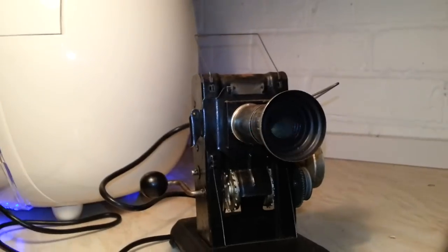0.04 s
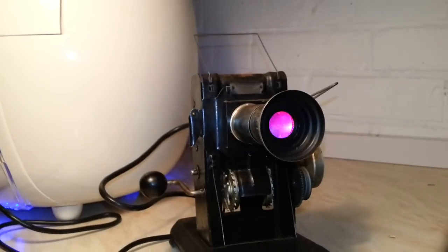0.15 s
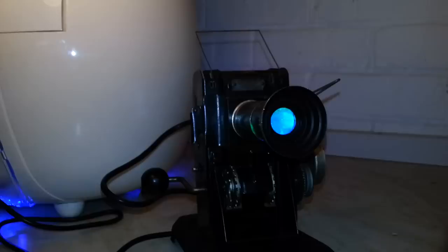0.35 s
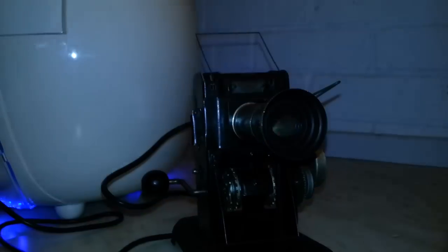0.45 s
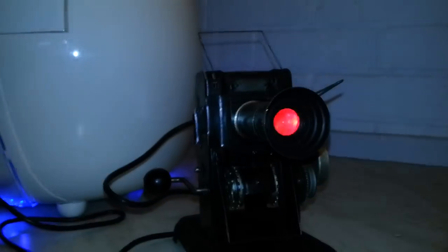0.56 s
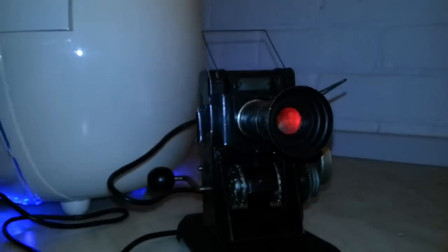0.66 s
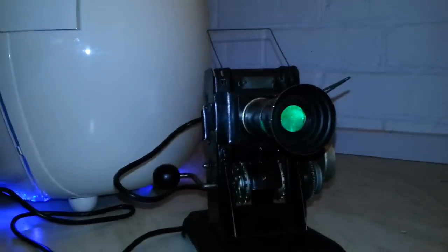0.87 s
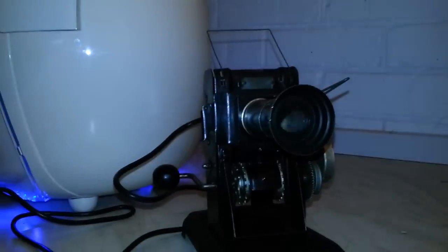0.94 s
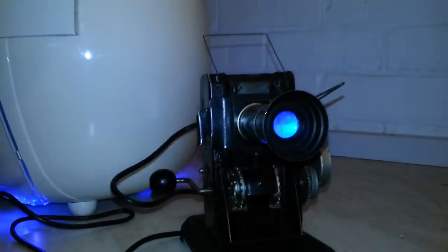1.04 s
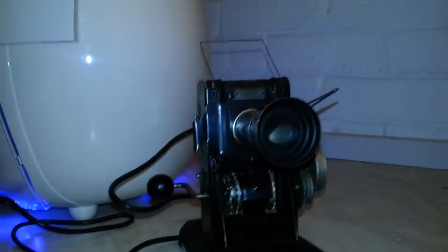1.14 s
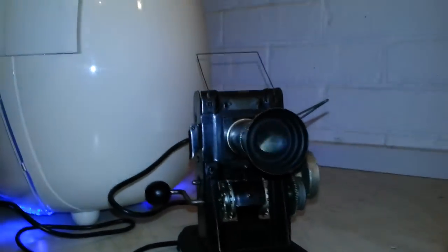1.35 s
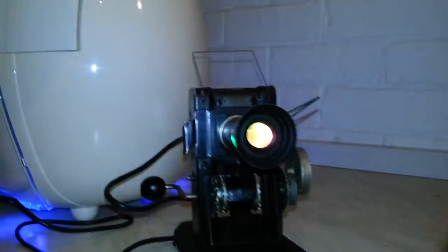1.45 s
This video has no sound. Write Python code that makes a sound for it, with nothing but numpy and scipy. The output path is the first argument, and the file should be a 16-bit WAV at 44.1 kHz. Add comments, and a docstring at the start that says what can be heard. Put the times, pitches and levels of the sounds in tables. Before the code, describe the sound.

A plastic light switch snaps down and straight back up, two sharp clicks close to the microphone and slightly right. Soft knocks and faint handling ticks surround them, over the low hiss and rumble of a small quiet room.

```python
"""A plastic light switch snaps down and back up, close by and a little to the right, in a small quiet room.
The button knocks softly as the finger loads it; then the spring snaps over and the contact lands and
rebounds. The housing and its mount ring, nearby surfaces and the room answer. Underneath are faint
plastic ticks, the hand rumbling on the housing, and low room rumble and hiss."""
import sys
import numpy as np
from scipy import signal
from scipy.fft import rfft, irfft
from scipy.io import wavfile
from scipy.ndimage import uniform_filter1d

SR = 44100
rng = np.random.default_rng(int(sys.argv[2]) if len(sys.argv) > 2 else 0)


def digitize_waveform(pressure):
    """Quantize a signal to 16-bit integers and store it at the path in sys.argv[1].

    Rows of a 2-D input are taken as channels; values are limited to [-1, 1].
    """
    field = np.atleast_2d(pressure).T
    bounded = np.clip(field, -1, 1)
    quanta = np.round(bounded * 32767).astype(np.int16)
    wavfile.write(sys.argv[1], SR, quanta)


N = 66150
T, HZ = np.arange(N) / SR, np.fft.rfftfreq(N, 1 / SR)

# spring snaps, down then up: t/s, level/dB, housing ring/dB, spring ping/dB, rattle/dB, room send/dB
SNAPS = [(0.2230, 0, -2.5, -28, 3, 2), (0.4114, -2.5, -6.5, -6.5, -4, -0.5)]
# ringing modes of the plastic housing (the first row is the lowest): f/Hz, level/dB, t60/s
HOUSING_MODES = [(1200, 9, 0.15), (1340, -21, 0.14), (1363, -0.5, 0.27), (1710, -8, 0.096), (1970, -7, .12),
                 (2135, -9, 0.08), (2680, -18, 0.072), (2750, -13, .12), (3160, 4.5, 0.069),
                 (3130, -13, 0.19), (3670, -14, 0.027), (3777, 10, 0.052)]


def amp(db):
    """Decibels to gain."""
    return 10 ** (np.asarray(db) / 20)


def curve(points, hz):
    """Reads a breakpoint curve on a log-frequency axis."""
    f, value = np.transpose(points)
    return np.interp(np.log(hz + 1), np.log(f), value)


def unit(x):
    """Normalises to a mean energy of one per channel."""
    return x / np.sqrt((x ** 2).sum(-1).mean() + 1e-20)


def delayed(x, s):
    """The same sound, s seconds later."""
    silence = np.zeros(x.shape[:-1] + (round(s * SR),))
    return np.concatenate([silence, x], -1)[..., :N]


def through(x, response):
    """Convolution, channel by channel."""
    return signal.fftconvolve(np.atleast_2d(x), np.atleast_2d(response), axes=1)[:, :N]


def impact(colour, size=4096):
    """A minimum-phase click shaped by an EQ curve."""
    log_gain = np.log(amp(curve(colour, abs(np.fft.fftfreq(size, 1 / SR)))))
    click = np.fft.ifft(np.exp(np.conj(signal.hilbert(log_gain)))).real
    return unit(np.pad(click[:size // 2], (0, N - size // 2)))


def ring(hz, t60):
    """One dying mode: the slope of a damped sine, for a hard attack."""
    damped_sine = amp(-60 * T / t60) * np.sin(2 * np.pi * hz * T)
    return np.diff(damped_sine, prepend=0) * SR / (2 * np.pi * hz)


def struck(modes):
    """A struck object, each mode starting with random polarity."""
    return unit(sum(amp(db) * rng.choice([-1, 1]) * ring(hz, t60) for hz, db, t60 in modes))


def stereo_noise(correlation):
    """White noise with the given left-right correlation."""
    a, b = rfft(rng.standard_normal((2, N)))
    return irfft(np.array([a, correlation * a + np.sqrt(1 - correlation ** 2) * b]), N)


def noise_bed(colour):
    """Wide, steady coloured noise at an rms of one."""
    # left-right likeness of the bed: f/Hz, correlation/0-1
    correlation = [(50, 0.13), (250, 0.32), (1000, 0.17), (10000, 0)]
    white = stereo_noise(curve(correlation, HZ))
    return np.sqrt(N) * unit(irfft(rfft(white) * amp(curve(colour, HZ)), N))


def room_tone():
    """Steady room rumble and hiss."""
    # room tone EQ: f/Hz, level/dB
    colour = [(15, -40), (25, -22), (60, -9.5), (100, -4.5), (200, -5), (300, -8), (500, -11.5),
              (800, -13.5), (1200, -15.5), (2200, -19), (3200, -19.5), (4500, -20), (6200, -26),
              (9000, -23.5), (14500, -24)]
    return amp(-56.5) * noise_bed(colour)


def reverb(x, attack_s=0.005):
    """The small room's diffuse tail, each band dying at its own speed."""
    # room decay: f/Hz, t60/s
    decay = [(200, 0.54), (1000, 0.29), (2500, 0.26), (5000, 0.27), (9000, 0.29), (14000, 0.61)]
    # tail EQ: f/Hz, level/dB
    colour = [(200, 12), (1000, -1.5), (2500, 0), (3800, 3.5), (5500, -3), (9000, 4), (14000, 0.5)]
    hz, t, bands = signal.stft(stereo_noise(correlation=0.17), SR, nperseg=256)
    bands = bands * amp(curve(colour, hz)[:, None] - 60 * t / curve(decay, hz)[:, None])
    tail = signal.istft(bands, SR, nperseg=256)[1][:, :N] * np.minimum(T / attack_s, 1)
    return unit(through(x, tail))


def reflections(x):
    """Early echoes off the table and the wall."""
    # echo taps: left delay/s, right delay/s, level/dB
    taps = [(.0029, .0027, -10), (.0072, 0.011, -12)]
    return sum(amp(db) * np.array([delayed(x, left), delayed(x, right)]) for left, right, db in taps)


def from_right(x, lag_s=0.000227):
    """A sound on the right reaches the left channel a little later."""
    x = np.atleast_2d(x)
    return np.array([delayed(x[0], lag_s), x[-1]])


def hand(start_s=0.08, end_s=0.579, fade_s=0.15):
    """Dull rubbing on the housing while the switch is held; fades are centred on start and end."""
    # rubbing EQ: f/Hz, level/dB
    colour = [(40, -44), (140, -18.5), (220, -3.5), (320, -7.5), (430, -16.5), (560, -7), (800, -22.5),
              (1800, -13.5), (4000, -28), (14000, -31.5)]
    held = np.clip(np.minimum(T - start_s, end_s - T) / fade_s + 0.5, 0, 1)
    return amp(-52.5) * held * noise_bed(colour)


def rattle(click, t60=0.024, attack_s=0.00087):
    """A dense, quickly dying cluster of tiny contacts: a flattened noise burst coloured by the click."""
    envelope = (1 - np.exp(-T / attack_s)) * amp(-60 * T / t60)
    spectrum = rfft(stereo_noise(correlation=0.34) * envelope)
    contour = np.sqrt(uniform_filter1d(abs(spectrum) ** 2, 900, axis=1))
    burst = unit(irfft(spectrum / contour, N) * (T < 2 * t60))
    return unit(through(click, burst))


def plastic_ticks():
    """Tiny scrapes of handled plastic, each around its own pitch."""
    # tick cues: t/s, level/dB, f/Hz
    cues = [(0.0935, -33, 3440), (0.118, -35, 3150), (0.149, -36, 3140), (0.7577, -38, 3880),
            (0.989, -34, 3400), (1.052, -31.5, 2750)]
    # tick EQ: multiple of the pitch, level/dB
    colour = [(.06, -19), (.5, -20), (.82, -17), (1, -4.5), (1.22, -18.5), (4, -25.5)]
    out = np.zeros((2, N))
    for s, db, hz in cues:
        tick = impact([(hz * multiple, level) for multiple, level in colour])
        out += amp(db) * delayed(rattle(tick, t60=0.019) + amp(0.5) * reverb(tick), s)
    return out


def button_knocks():
    """The button knocks in its guide; such soft blows wake only the housing's lowest mode."""
    # knock cues: t/s, level/dB
    cues = [(0.1187, -21), (0.1472, -14.5), (0.1925, -14.5), (0.2190, -14.5), (0.3537, -10.5)]
    # knock EQ: f/Hz, level/dB
    colour = [(100, -47), (250, -21.5), (550, -20.5), (800, -16), (1020, -4), (1180, 1), (1450, -15),
              (1800, -10.5), (2500, -29), (3500, -23.5), (5000, -41), (14000, -37)]
    blow = impact(colour)
    housing = unit(through(blow, ring(HOUSING_MODES[0][0], t60=0.098)))
    knock = from_right(unit(blow + amp(-2) * housing))
    return sum(amp(db) * delayed(knock + amp(-8.5) * reverb(blow), s) for s, db in cues)


def mount_ring():
    """Each snap leaves a faint, hollow low ring in whatever holds the switch."""
    # modes of the mount: f/Hz, level/dB, t60/s
    modes = [(197.7, -3, .5), (242.3, 0, 0.62), (311.5, -3.5, 0.36)]
    return sum(amp(-21.5) * delayed(from_right(struck(modes)), s) for s, *_ in SNAPS)


def contact_landings():
    """The contact lands and rebounds, each hit a click with a short rattle."""
    # hits around the snaps: t/s, level/dB, rattle/dB
    cues = [(0.2237, -0.5, -2), (0.2259, -14, 2), (0.4105, -12.5, -1.5), (0.4392, -14.5, -0.5),
            (0.4510, -19.5, -2)]
    # contact EQ: f/Hz, level/dB
    colour = [(100, -34), (550, -16), (750, -6.5), (1000, -1.5), (1350, 1.5), (1900, 3.5), (2400, -0.5),
              (3400, 4), (4600, -8.5), (7000, -12.5), (14500, -26.5)]
    click = impact(colour)
    out = np.zeros((2, N))
    for s, db, rattle_db in cues:
        out += amp(db) * delayed(from_right(click + amp(rattle_db) * rattle(click)), s)
    return out


def spring_snaps():
    """The spring snaps over with a sharp click, pings and rattles, and sets the housing ringing."""
    # click EQs, one going down and one coming up: f/Hz, level/dB
    colours = [
        [(100, -49.5), (300, -27.5), (600, -20.5), (760, -11), (950, -6), (1200, 0.5), (1650, -3), (2200, 3.5),
         (3000, -2), (3750, -8.5), (4300, -10.5), (5200, -7.5), (6000, -12), (8500, -21), (10000, -26),
         (14500, -30.5)],
        [(100, -40), (300, -22), (600, -11), (850, -9), (1250, 3), (1650, -3), (2200, 1.5), (3100, 0.5),
         (3750, -11), (4250, -7), (4800, -10), (6000, -10.5), (8500, -21.5), (10000, -24.5), (14500, -26)],
    ]
    # modes of the spring: f/Hz, level/dB, t60/s
    spring_modes = [(4220, 2, 0.046), (5030, -8, 0.057), (5300, -3, .025), (6880, 4, 0.049)]
    out = np.zeros((2, N))
    for (s, db, ring_db, ping_db, rattle_db, room_db), colour in zip(SNAPS, colours):
        click = impact(colour)
        chatter = amp(rattle_db) * rattle(click)
        housing = amp(ring_db) * struck(HOUSING_MODES)
        ping = amp(ping_db) * struck(spring_modes)
        space = reflections(click) + amp(room_db) * reverb(click)
        out += amp(db) * delayed(from_right(click + chatter + housing + ping) + space, s)
    return out


def scene():
    """The switch up front, over handling noise and room tone."""
    switch = spring_snaps() + contact_landings() + mount_ring() + button_knocks()
    return switch + plastic_ticks() + hand() + room_tone()


def record(dry):
    """A steep high cut on the whole mix."""
    cutoff_hz = 14680
    high_cut = signal.firwin(401, cutoff_hz, window=("kaiser", 7), fs=SR)
    return signal.oaconvolve(dry, high_cut[None], "same")


dry = scene()
out = record(dry)
digitize_waveform(out)
```